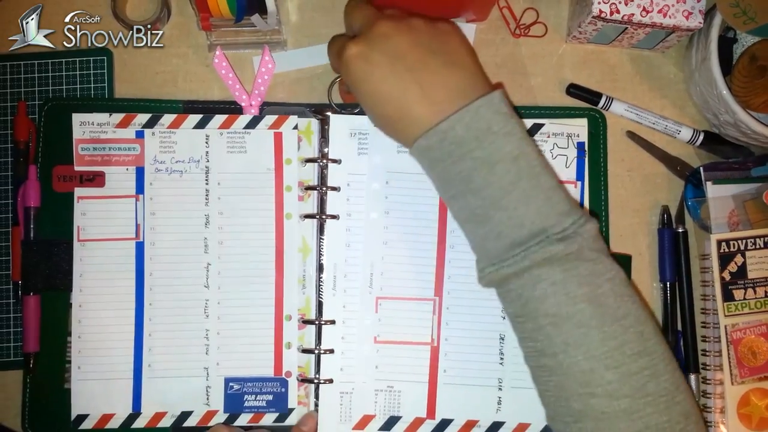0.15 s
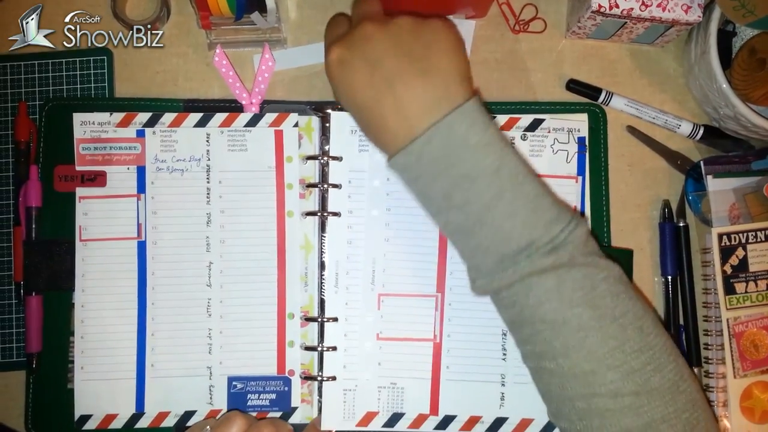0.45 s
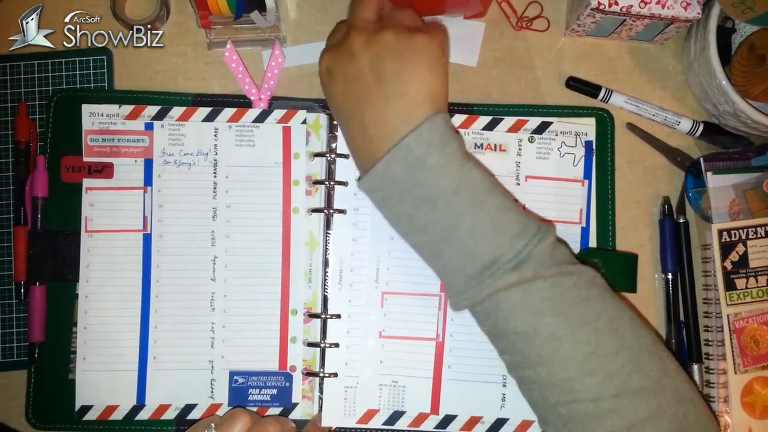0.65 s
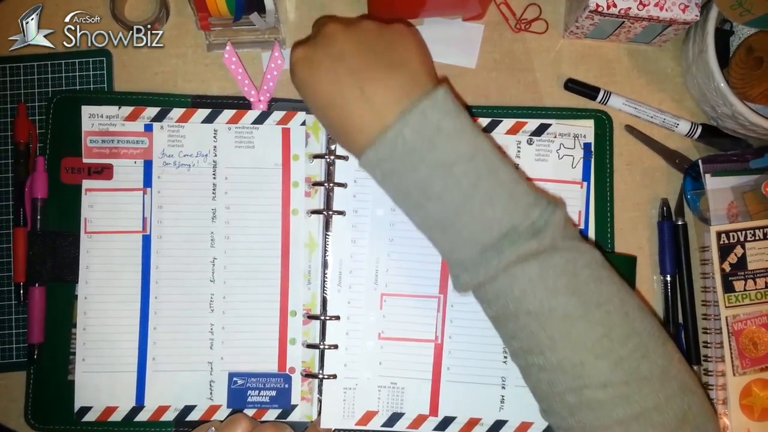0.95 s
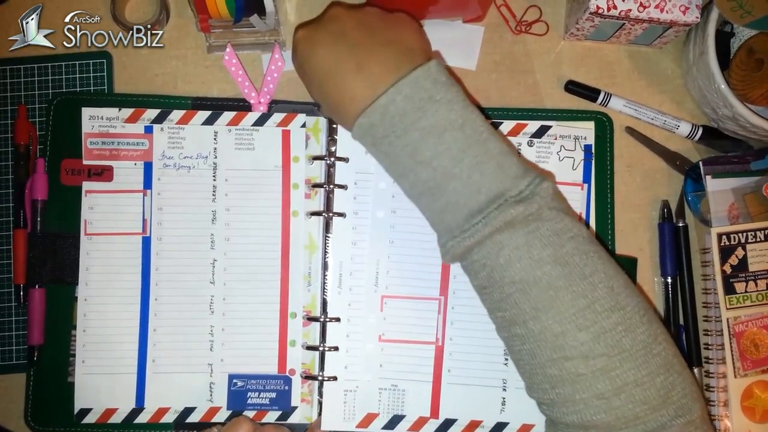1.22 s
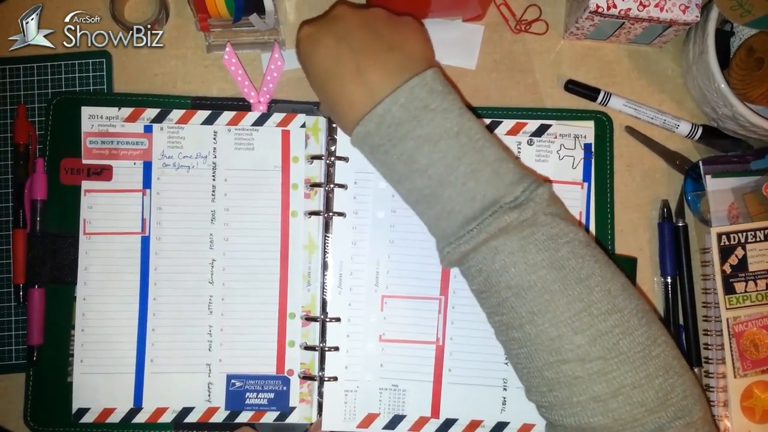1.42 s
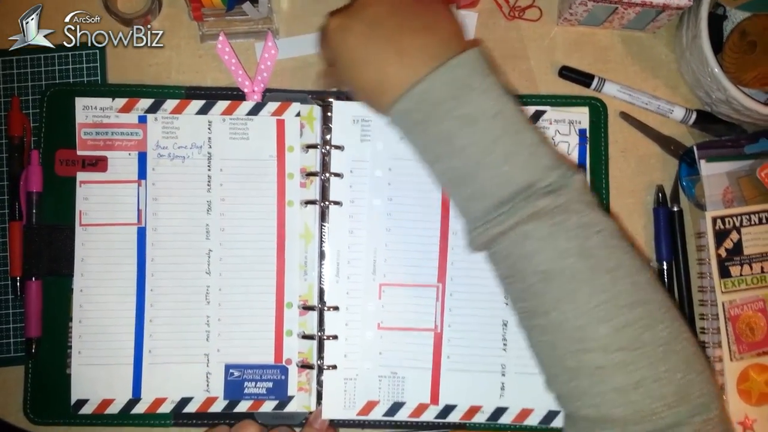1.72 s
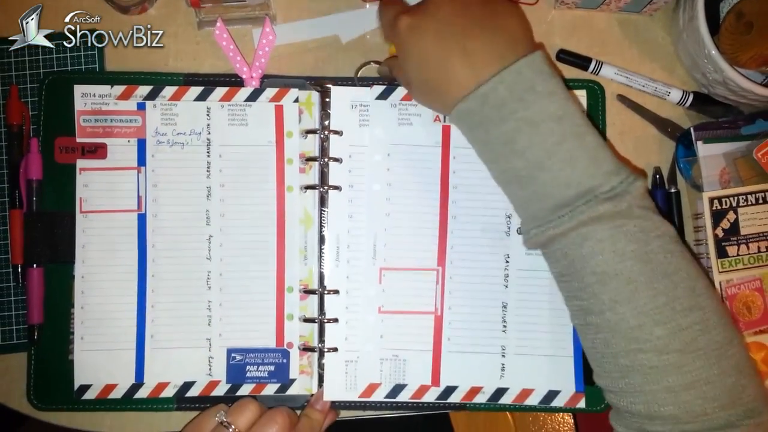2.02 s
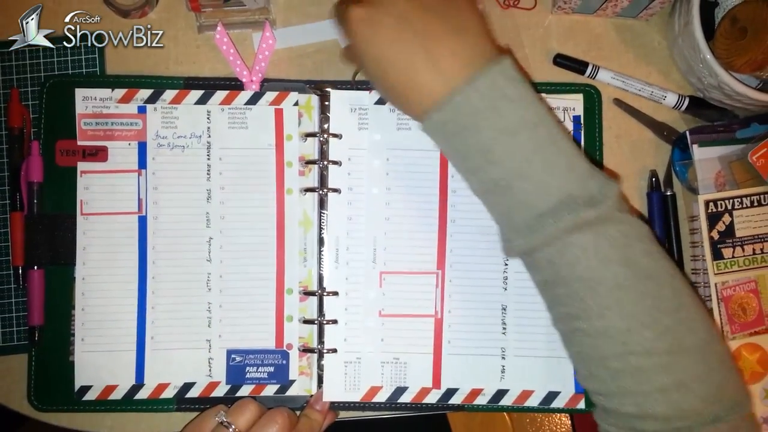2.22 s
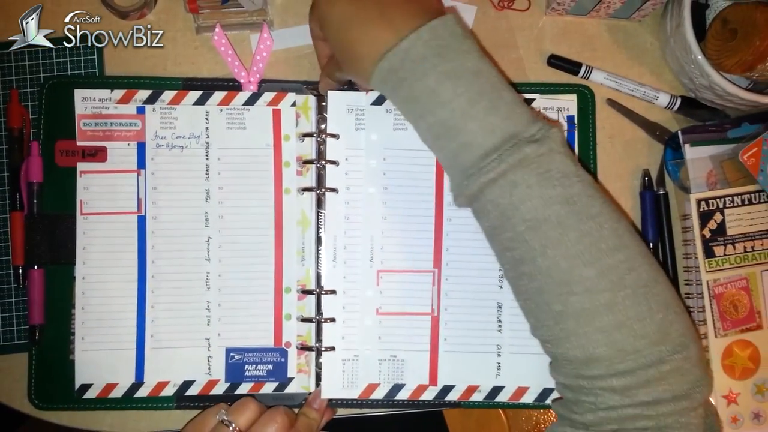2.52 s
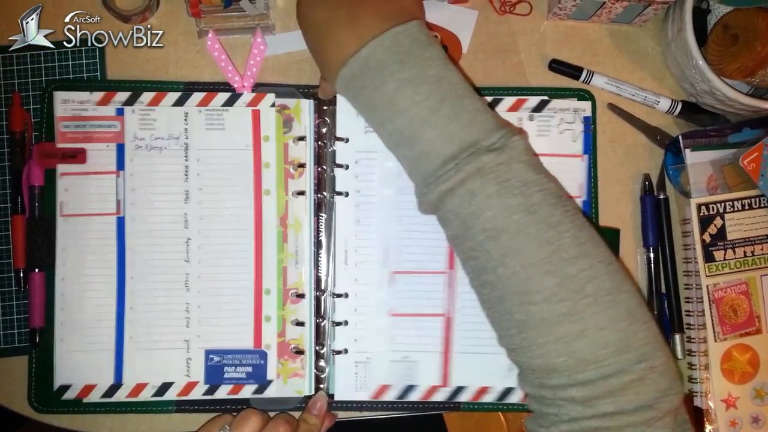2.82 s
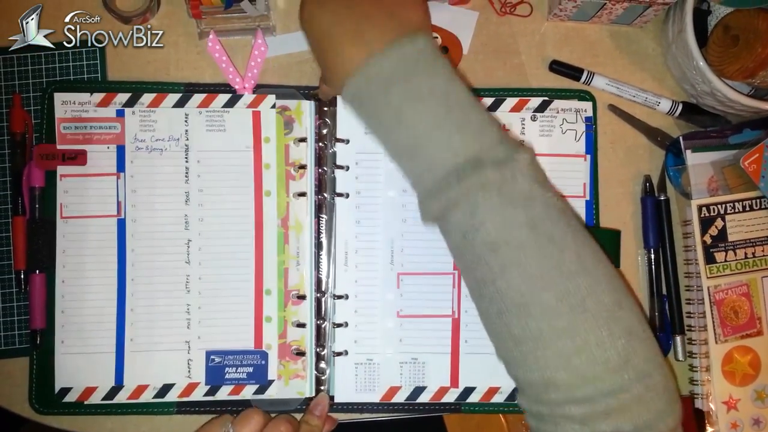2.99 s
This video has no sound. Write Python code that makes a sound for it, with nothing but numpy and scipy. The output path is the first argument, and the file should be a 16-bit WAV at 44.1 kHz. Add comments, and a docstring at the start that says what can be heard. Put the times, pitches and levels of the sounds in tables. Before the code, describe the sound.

A ring binder bumps a desk as paper crackles, before its rings close with a snap.

```python
"""A desk in a small room, where paper pages are worked onto the open rings of a planner.
The binder knocks on the desk, punched sheets slide over each other and crackle as they catch on the
rings, and the steel tips tick together. Then the sprung rings snap shut with a clash, a rattle and a
thump. It is heard in stereo from just above, over a low room rumble and microphone hiss."""
import sys
import numpy as np
from scipy import signal
from scipy.fft import rfft, irfft
from scipy.io import wavfile

SR = 44100
rng = np.random.default_rng(int(sys.argv[2]) if len(sys.argv) > 2 else 0)


def put_to_file(sound):
    """Save the sound as 16-bit audio at rate SR, in the file named by the first command-line argument."""
    columns = np.atleast_2d(sound).T  # one column per channel
    safe = np.clip(columns, -1, 1)
    whole_steps = np.round(safe * 32767)
    wavfile.write(sys.argv[1], SR, whole_steps.astype(np.int16))


N = 138915

# Hard attack of the spine: freq_hz, gain_db
CLASH_SPECTRUM = [(150, -33), (450, 2), (630, -1), (850, 1.5), (1300, 2.5), (1750, -15.5), (2200, -7.5),
                  (2900, -5), (3400, -8), (4500, -5), (6300, -21), (8000, -34), (15000, -22)]
# Shudder of pages and spine: freq_hz, gain_db
RATTLE_SPECTRUM = [(150, -37), (300, 17), (450, 10), (630, 12.5), (800, 14.5), (1100, 6), (1400, 6),
                   (1750, -4), (2300, -9), (3400, -5), (4500, -3.5), (6300, -26), (8500, -12), (15000, -39)]
# Metallic tail of rings and spine: pitch_hz, level_db, t60_s
STEEL_MODES = [(2235, -4, 0.14), (2396, -24, 0.15), (2440, -8, 0.12), (2800, 13, 0.044), (3208, -15, 0.14),
               (3620, -12.5, 0.1), (4081, 5, 0.15)]
# Low punch of the recoil: freq_hz, gain_db
THUMP_SPECTRUM = [(40, -39), (100, -21), (190, -3), (300, 16), (390, -1), (700, -24), (1500, -20),
                  (5000, -72)]
def ring_snap():
    """The rings shut: the spine clashes and rings, the pages rattle, and the recoil thumps the desk."""
    out = np.zeros((2, N))
    shut_s, lag_s = 2.8252, 0.001
    seat_s = shut_s + lag_s  # the spine seats just after the rings meet
    kick_s = seat_s + lag_s  # then it kicks the binder
    add(out, colour(burst(t60_s=0.022), CLASH_SPECTRUM), seat_s, level_db=5.5, pan_db=4)
    rattle = burst(t60_s=0.14) * chatter()
    add(out, colour(rattle, RATTLE_SPECTRUM), kick_s, level_db=4, pan_db=1)
    add(out, modes(STEEL_MODES), seat_s, level_db=-9.5, pan_db=4)
    add(out, colour(signal.unit_impulse(SR), THUMP_SPECTRUM), kick_s, level_db=2, pan_db=1)
    add(out, knock(force_db=9, bass_hz=162, contact_hz=1310), kick_s, level_db=9, pan_db=1)
    return out


def chatter(contacts_per_s=250, scatter_db=5):
    """A one-second gain envelope of loose contacts, each with its own strength."""
    contact_db = scatter_db * rng.standard_normal(contacts_per_s + 1)
    return undb(np.repeat(contact_db, SR // contacts_per_s)[:SR])


# Body of the binder and desk top: pitch_hz, level_db, t60_s
DESK_MODES = [(152, -10, 0.58), (183.4, -7.5, 0.62), (231.5, -12, 0.23), (275.8, 1.5, 0.28),
              (302.5, -6.5, 0.046), (330.2, 1.5, 0.1), (447, 0, 0.1), (476.4, 1.5, 0.066), (604, -5, 0.047),
              (759, -6, 0.096), (815, -9, 0.039), (913, -6.5, 0.044), (1065, -15.5, 0.07), (1210, 0, 0.021),
              (1504, -6, 0.055)]
# Slap of the cover: freq_hz, gain_db
COVER_SPECTRUM = [(100, -30), (300, -5), (480, -1), (610, -6), (760, 0), (950, -2), (1300, 1), (2500, -5),
                  (5000, -9), (8000, -5), (15000, -8)]
def knock(force_db, bass_hz, contact_hz):
    """The cover slaps the desk and both ring; where the blow lands decides how much bass it has."""
    lightness_db = max(-force_db, 0)
    decay_scale = undb(-0.3 * lightness_db)  # on a light tap the hand stays on and damps the binder
    damped_modes = [(hz, db, t60_s * decay_scale) for hz, db, t60_s in DESK_MODES]
    desk = undb(0.07 * lightness_db) * modes(damped_modes)
    cover = undb(-0.5) * unit(colour(burst(t60_s=0.075 * decay_scale), COVER_SPECTRUM))
    return cut_bass(soften(desk + cover, contact_hz), bass_hz)


# Bumps of the binder on the desk: start_s, level_db, bass_cut_hz, contact_cutoff_hz, pan_db
KNOCK_CUES = [(0.002, -11.5, 159, 290, 2), (0.04, -20.5, 199, 930, -1), (0.1, -25, 343, 1830, 8),
              (0.216, -21.5, 656, 1160, 2), (0.53, -23, 385, 870, 2), (0.5904, 0, 300, 710, 5),
              (0.594, 3, 276, 690, -1), (0.6024, -2, 255, 515, 1), (0.622, -13, 300, 600, -1),
              (0.655, -14, 300, 650, 1), (0.7234, -4.5, 330, 960, 4), (0.728, -14, 450, 700, -3),
              (0.739, 8, 121, 1320, 2), (0.7412, -3.5, 665, 1290, 5), (0.752, -19, 130, 890, 2),
              (0.833, -6, 530, 895, -1), (1.135, -24, 346, 805, 2), (1.153, -23, 334, 805, 0),
              (1.703, -27, 290, 580, 0), (1.841, -23.5, 340, 885, 2), (2.012, -27, 617, 2010, 3),
              (2.052, -21, 120, 258, -1), (2.158, -29.5, 566, 1410, 1), (2.476, -24.5, 400, 1210, 0),
              (2.481, -18.5, 423, 1310, 3.5), (2.4848, -18, 330, 1130, 2), (3.056, -25, 330, 1100, 1),
              (3.094, -23.5, 310, 1530, 4), (3.11, -21.5, 308, 1510, 2)]
# Faint hollow tone after one light tap: pitch_hz, level_db, t60_s
HOLLOW_MODES = [(715, 4, 0.22), (781.4, -4, 0.22)]
def binder_knocks():
    """The binder is nudged against the desk as the pages are pushed home."""
    out = np.zeros((2, N))
    for start_s, level_db, bass_hz, contact_hz, pan_db in KNOCK_CUES:
        add(out, knock(level_db, bass_hz, contact_hz), start_s, level_db, pan_db)
    add(out, modes(HOLLOW_MODES), start_s=0.216, level_db=-25.5)
    return out


# Paper snags: start_s, level_db, hold_s, edge_pitch_hz, edge_gain_db, cutoff_hz, pan_db
CRACKLE_CUES = [(0.102, -21.5, 0.0047, 1870, 6, 2290, 2), (0.117, -21.5, 0.014, 1700, 1, 2080, -1),
                (0.216, -29, 0.0021, 2150, -2, 2540, 0), (0.494, -24, 0.0078, 2240, 24, 1900, 6),
                (0.526, -24, 0.01, 2190, 7, 3430, 3), (0.7547, -17, 0.0016, 2360, 13, 2600, 0),
                (0.7865, -15, 0.0011, 2420, 4, 7500, 6), (0.791, -13.5, 0.00076, 2330, 13, 5000, 5),
                (0.795, -14.5, 0.0055, 2580, 9, 10900, -5), (0.8177, -10.5, 0.004, 2620, 15, 6900, 4),
                (0.8307, -8.5, 0.0025, 2900, 19, 6650, 1), (0.842, -7, 0.0078, 2100, 6.5, 6800, 5),
                (0.849, -12.5, 0.0027, 2700, 13, 7460, -6), (0.869, -20, 0.0093, 2170, 15, 6000, 4),
                (0.8967, -19.5, 0.003, 2240, 13, 6000, 1), (1.129, -31, 0.011, 2200, 3, 2200, 1),
                (1.458, -32, 0.005, 2540, 3, 3500, .5), (1.791, -33, 0.0095, 2250, 5, 3540, 1),
                (1.822, -25.5, 0.0036, 2200, 15, 3500, 6), (1.838, -23.5, 0.0089, 2300, 3, 4220, 4),
                (1.848, -17.5, 0.0076, 2600, 5, 5230, -2), (1.867, -26, 0.037, 2200, 14, 5000, 8),
                (1.958, -28, 0.0017, 2260, -8, 2240, 5), (2.007, -29.5, 0.0067, 2210, 0, 3000, 4),
                (2.156, -34, 0.0042, 2270, 3, 4070, 6), (2.481, -26.5, 0.006, 1790, -4, 3530, -4),
                (2.8214, -10.5, 0.0046, 2130, 4, 2500, -7), (2.836, -2.5, 0.005, 2250, 8, 2500, 3),
                (2.908, -20, 0.0016, 1830, 2, 1800, 6), (3.079, -33, 0.0019, 2280, 3, 5180, 5),
                (3.092, -24.5, 0.019, 2190, 0, 4100, 0)]
# Crisp tone of a snagged sheet: freq_hz, gain_db
SHEET_SPECTRUM = [(150, -28), (600, -12), (1500, -7), (2000, -3), (2900, -2), (3400, -9), (3800, -8),
                  (4120, 0), (4600, -4), (5200, -9.5), (5900, -16), (8500, -9), (10500, -11), (15000, -16)]
def paper_crackles(t60_s=0.011, edge_width_hz=185, stereo_width=0.54):
    """A punched hole sticks and slips on a ring; the paper edge beside it rings at its own pitch."""
    out, t = np.zeros((2, N)), np.arange(SR) / SR
    for start_s, level_db, hold_s, edge_hz, edge_db, cutoff_hz, pan_db in CRACKLE_CUES:
        envelope = np.exp(-np.log(1000) * np.maximum(t - hold_s, 0) / t60_s)
        mid_side = rng.standard_normal((2, SR)) * np.array([[1], [stereo_width]])
        slips = mid_side * rng.exponential(size=SR) * envelope
        sheet = colour(spread(slips), SHEET_SPECTRUM)
        edge = signal.lfilter(*signal.iirpeak(edge_hz, edge_hz / edge_width_hz, fs=SR), sheet)
        add(out, soften(sheet + undb(edge_db) * edge, cutoff_hz), start_s, level_db, pan_db)
    return out


# Swishes of paper: start_s, peak_s, end_s, level_db
SLIDE_CUES = [(-0.1, 0.005, 0.27, -52.5), (0.432, 0.544, 2.4, -57), (0.808, 0.819, 0.91, -43),
              (1.438, 1.5, 1.53, -57.5), (1.779, 1.821, 2.07, -53), (3.055, 3.11, 3.12, -49.5)]
# Tone of paper rubbing on paper: freq_hz, gain_db
FRICTION_SPECTRUM = [(150, 4), (600, 13), (1500, 2.5), (2000, 7), (2600, 6), (3400, 3.5), (4400, 5),
                     (5800, -4), (8500, -6), (15000, -10)]
def paper_slides(grains_per_s=500, scatter_db=1.5):
    """Fibres rub in tiny grains, swelling and fading as one sheet moves over another."""
    t = np.arange(N) / SR
    swells = sum(undb(level_db) * np.interp(t, [start_s, peak_s, end_s], [0, 1, 0]) ** 1.38
                 for start_s, peak_s, end_s, level_db in SLIDE_CUES)
    noise = rng.standard_normal((2, N))
    grain_db = scatter_db * np.repeat(rng.standard_normal(N), SR // grains_per_s)[:N]
    friction = colour(spread(noise * undb(grain_db)), FRICTION_SPECTRUM)
    return np.sqrt(N) * unit(soften(friction, cutoff_hz=13500)) * swells


# Touches of the ring tips: start_s, level_db, pan_db
TICK_CUES = [(0.738, -19, 3), (0.753, -33, -4), (1.848, -27.5, 0), (2.481, -30.5, -5), (2.488, -44, -2),
             (2.8249, -12.5, -15), (2.8285, -15, -6)]
# Bright glint of steel on steel: freq_hz, gain_db
TICK_SPECTRUM = [(1000, -25), (4000, -8), (6000, -5), (8000, 0), (11000, -3), (15000, -8)]
def ring_ticks():
    """The steel ring tips touch in short, bright ticks."""
    out = np.zeros((2, N))
    for start_s, level_db, pan_db in TICK_CUES:
        add(out, colour(burst(t60_s=0.011), TICK_SPECTRUM), start_s, level_db, pan_db)
    return out


# Decay of the room across the range: freq_hz, t60_s
REVERB_DECAY = [(120, 0.49), (400, 0.3), (1000, 0.36), (3000, 0.3), (7000, 0.33), (15000, 0.21)]
# Tone of the reflections: freq_hz, gain_db
REVERB_SPECTRUM = [(60, -17), (150, 1), (280, -3), (460, 0), (620, -0.5), (900, -2.5), (2500, -3.5),
                   (4500, -4.5), (7000, 0), (15000, 2.5)]
def room_reverb(x, send_db=-5, predelay_s=0.0092):
    """The walls of a small room return a diffuse tail, each octave with its own decay."""
    hz = np.fft.rfftfreq(SR, 1 / SR)
    noise_spectrum = rfft(spread(rng.standard_normal((2, SR))))
    tail = np.zeros((2, SR))
    for centre_hz in SR / 2 ** np.arange(1, 11):
        octave = np.clip(1 - abs(np.log2((hz + 1) / centre_hz)), 0, 1)
        tail += irfft(noise_spectrum * octave, SR) * fade(curve(REVERB_DECAY, centre_hz))
    onset = np.clip(np.arange(SR) / SR / predelay_s - 1, 0, 1)
    tail = colour(unit(tail * onset), REVERB_SPECTRUM)
    return undb(send_db) * signal.fftconvolve(x.mean(axis=0)[None], tail, axes=-1)[:, :N]


# Low bed of room tone: freq_hz, gain_db
RUMBLE_SPECTRUM = [(20, -16), (50, -9.5), (80, 1.5), (160, 2), (260, -5), (500, -18), (1500, -32),
                   (6000, -84)]
def room_rumble(level_db=-60.5):
    """The room hums with a steady, low noise."""
    rumble = colour(spread(rng.standard_normal((2, N))), RUMBLE_SPECTRUM)
    return np.sqrt(N) * unit(rumble) * undb(level_db)


# Noise floor of the microphone: freq_hz, gain_db
HISS_SPECTRUM = [(30, -4), (150, 13.5), (400, 5), (1000, -2), (3000, -6.5), (6000, -11.5), (10000, -10.5),
                 (15000, -13)]
# Slow ride on the hiss level: time_s, lift_fraction
HISS_RIDE = [(0, 1), (.35, 0.42), (.9, 0.74), (1.3, 0.09), (1.652, 0.3), (1.95, 1), (2.35, 0.13),
             (2.75, 0.36), (2.95, 1)]
def microphone_hiss(floor_db=-59.5, lift_db=5):
    """Each channel has its own hiss, a little stronger around the handling."""
    lift = np.interp(np.arange(N) / SR, *np.array(HISS_RIDE).T)
    hiss = colour(rng.standard_normal((2, N)), HISS_SPECTRUM)
    return np.sqrt(N) * unit(hiss) * undb(floor_db + lift_db * lift)


def modes(table, scatter_db=3.5):
    """A struck object rings; the share of each mode varies from blow to blow."""
    t = np.arange(SR) / SR
    offsets_db = scatter_db * rng.standard_normal(len(table))
    return unit(sum(undb(level_db + offset_db) * fade(t60_s) * np.sin(2 * np.pi * pitch_hz * t)
                    for (pitch_hz, level_db, t60_s), offset_db in zip(table, offsets_db)))


def burst(t60_s):
    """Countless close modes die away together as stereo noise."""
    return spread(rng.standard_normal((2, SR))) * fade(t60_s)


def fade(t60_s):
    """One second of exponential decay, 60 dB down at t60_s."""
    return np.exp(-np.log(1000) * np.arange(SR) / SR / t60_s)


def spread(mid_side, split_hz=1050):
    """Two unrelated signals become a stereo pair, centred in the bass and wide above split_hz."""
    mid, side = mid_side[0], cut_bass(mid_side[1], split_hz, order=1)
    return np.array([mid + side, mid - side])


def colour(x, spectrum, size=4096):
    """Minimum-phase EQ, built from the folded cepstrum, so nothing sounds ahead of an attack."""
    gain = undb(curve(spectrum, np.fft.rfftfreq(size, 1 / SR)))
    cepstrum = irfft(np.log(gain))
    cepstrum[1:size // 2] *= 2
    cepstrum[size // 2 + 1:] = 0
    impulse = irfft(np.exp(rfft(cepstrum)))
    return signal.fftconvolve(np.atleast_2d(x), impulse[None], axes=-1)[:, :x.shape[-1]]


def soften(x, cutoff_hz):
    """A softer contact passes less treble."""
    return signal.sosfilt(signal.butter(2, cutoff_hz, fs=SR, output="sos"), x)


def cut_bass(x, cutoff_hz, order=2):
    """Roll off the low end."""
    return signal.sosfilt(signal.butter(order, cutoff_hz, "high", fs=SR, output="sos"), x)


def curve(points, hz):
    """Read (freq_hz, value) points on a log-frequency axis."""
    freqs_hz, values = np.array(points).T
    return np.interp(np.log(hz + 1), np.log(freqs_hz), values)


def undb(db):
    """Turn decibels into a gain."""
    return 10 ** (np.asarray(db) / 20)


def unit(x):
    """Scale to an average energy of one per channel."""
    return x / np.sqrt(np.mean(np.sum(x ** 2, axis=-1)))


def add(out, x, start_s, level_db, pan_db=0):
    """Place a hit in the mix: level_db sets its energy, pan_db is left minus right."""
    start = int(start_s * SR)
    x = unit(x) * undb(level_db + np.array([[pan_db], [-pan_db]]) / 2)
    out[:, start:start + x.shape[1]] += x[:, :N - start]


def scene():
    """The binder plays up close and the room answers, over a bed of rumble and hiss."""
    handling = binder_knocks() + paper_crackles() + paper_slides() + ring_ticks() + ring_snap()
    close = cut_bass(handling, cutoff_hz=204)  # the close sounds carry little deep bass
    return close + room_reverb(close) + room_rumble() + microphone_hiss()


def record(dry):
    """A steep low-pass takes off the very top."""
    top_hz = 14750
    return signal.sosfilt(signal.ellip(10, .2, 80, top_hz, fs=SR, output="sos"), dry)


dry = scene()
out = record(dry)
put_to_file(out)
```